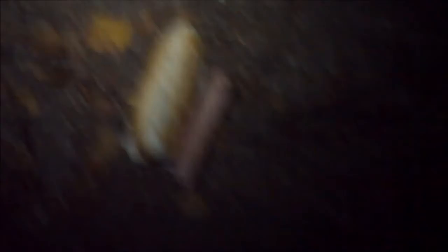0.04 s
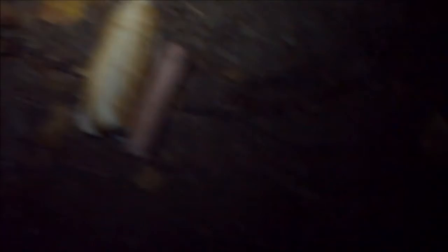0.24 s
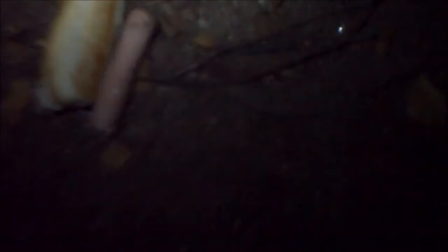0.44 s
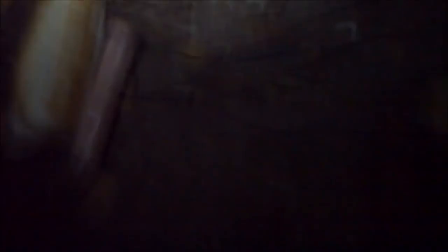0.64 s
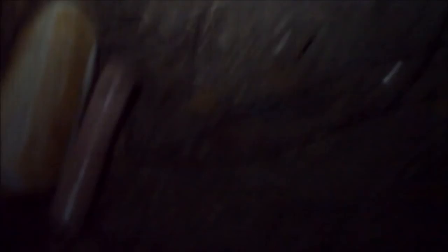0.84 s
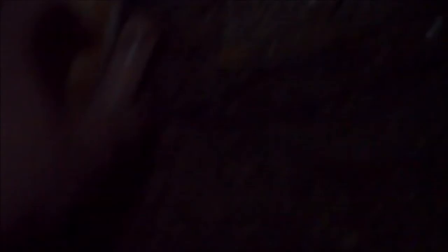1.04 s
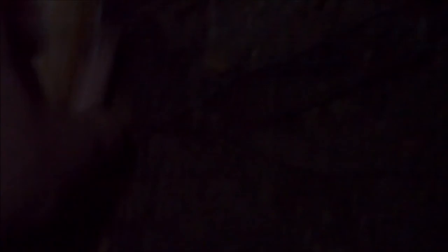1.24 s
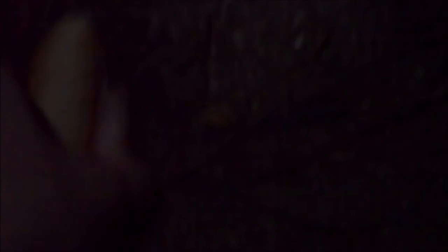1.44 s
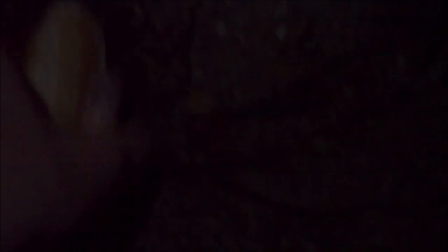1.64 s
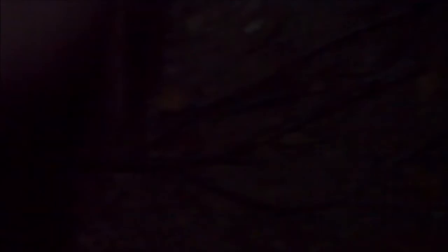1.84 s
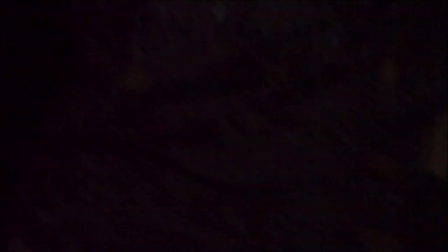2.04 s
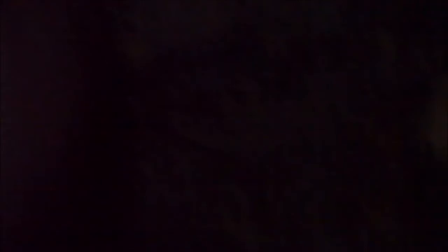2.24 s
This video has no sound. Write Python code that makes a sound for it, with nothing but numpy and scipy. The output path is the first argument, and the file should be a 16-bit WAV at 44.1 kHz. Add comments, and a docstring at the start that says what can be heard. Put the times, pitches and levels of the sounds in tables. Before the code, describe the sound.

A trap drops with a loud knock and metal snap, thuds again, and dry leaves rustle.

```python
"""A trap drops at night

Outdoors, close to the microphone: a wooden weight lands with a heavy knock and a steel snap that
overloads the input. It scrapes over dry litter, then comes down on its base with a duller, deeper thud.
Around it twigs tick, leaves rustle and crunch once underfoot, and air bumps the microphone over a hiss."""
import sys
import numpy as np
from scipy import signal
from scipy.fft import rfft, irfft, next_fast_len
from scipy.io import wavfile
from scipy.ndimage import uniform_filter1d, map_coordinates

SR = 44100
rng = np.random.default_rng(int(sys.argv[2]) if len(sys.argv) > 2 else 0)


def unload_wav(signal):
    """Save mono or channel-first audio to the path in sys.argv[1] as 16-bit WAV at rate SR, clipped to [-1, 1]."""
    wavfile.write(
        sys.argv[1],
        SR,
        np.round(np.clip(np.atleast_2d(signal).T, -1, 1) * 32767).astype(np.int16),
    )


N = 101429
T = np.arange(N) / SR
RING = T[:SR * 3 // 4]  # time since a blow, s


def amp(db):
    return 10 ** (np.asarray(db) / 20)


def unit_rms(x):
    return x / np.sqrt(np.mean(x ** 2) + 1e-20)


def along(points, hz):
    """Interpolate (Hz, value) points on a log frequency axis."""
    knots_hz, values = np.transpose(points)
    return np.interp(np.log(hz + 1), np.log(knots_hz + 1), values)


def filtered(x, response):
    """x through a gain that depends on frequency."""
    size = next_fast_len(len(x) + 8192)
    return irfft(rfft(x, size) * response(np.fft.rfftfreq(size, 1 / SR)), size)[:len(x)]


def coloured(x, spectrum):
    """x shaped by a spectrum, at rms 1."""
    return unit_rms(filtered(x, lambda hz: amp(along(spectrum, hz))))


def noise(spectrum, samples=N):
    return coloured(rng.standard_normal(samples), spectrum)


def wobble(knots_per_s):
    """A smooth random curve."""
    knots = rng.standard_normal(int(N * knots_per_s / SR) + 4)
    return map_coordinates(knots, [T * knots_per_s / SR])


def add(track, start_s, sound):
    part = track[round(start_s * SR):][:len(sound)]
    part += sound[:len(part)]


def swells(rows):
    """Envelope of bell-shaped swells, summed in power."""
    return np.sqrt(sum(amp(db) ** 2 * np.exp(-((T - peak_s) / np.where(T < peak_s, rise, fall)) ** 2)
                       for peak_s, db, rise, fall in rows))


def friction(spectrum, grains_per_s, patchy_db, spread_db=3.5):
    """Tiny crackles on an equally loud rubbing hiss, patchy in time and frequency, at rms 1."""
    grains = (rng.random(N) < grains_per_s / SR) * rng.choice([-1, 1], N)
    grains = grains * amp(spread_db * np.minimum(rng.exponential(size=N), 3))
    rubbing = coloured(unit_rms(grains) + rng.standard_normal(N), spectrum)
    bands = signal.stft(rubbing, nperseg=512)[2]
    patches = uniform_filter1d(rng.standard_normal(bands.shape), size=6, axis=0)
    patches = unit_rms(uniform_filter1d(patches, size=5, axis=1))
    return unit_rms(signal.istft(bands * amp(patchy_db * patches))[1][:N])


# Night hiss behind everything: freq_hz, density_db
HISS_SPECTRUM = [(12, -26), (20, -2), (45, -13.5), (139, -16.5), (401, -17), (541, -19.5), (1100, -20),
                 (1190, -23.5), (3650, -27), (5490, -33), (8970, -30), (13500, -36)]
# Its slow drift: time_s, level_db
HISS_LEVELS = [(0, -40.5), (.2, -42), (.75, -40), (1.0, -44), (1.37, -44.5), (1.7, -43), (1.95, -42.5),
               (2.3, -45.5)]
# Air right on the microphone: peak_s, level_db, rise_s, fall_s
BUMPS = [(.01, -34, .03, 0.017), (.375, -33.5, 0.03, 0.034), (1.115, -39.5, 0.03, 0.06),
         (1.68, -32, 0.016, 0.034), (1.78, -38.5, 0.054, 0.049)]
# Its rumble: freq_hz, density_db
BUMP_SPECTRUM = [(10, 5), (30, -0.5), (48, 0), (75, -21), (150, -29.5), (400, -68)]

def night_air(waver_db=0.78):
    """Faint outdoor hiss, and low bumps of air on the moving microphone."""
    hiss = noise(HISS_SPECTRUM) * amp(np.interp(T, *np.transpose(HISS_LEVELS)) + waver_db * wobble(15))
    return hiss + noise(BUMP_SPECTRUM) * swells(BUMPS)


# Footfalls under the crunch: peak_s, level_db, rise_s, fall_s
STEPS = [(2.0, -39, 0.021, .025), (2.12, -47.5, 0.026, 0.025)]
# Their low thump: freq_hz, density_db
STEP_SPECTRUM = [(30, -25), (80, -8), (115, 4), (170, -10.5), (300, -21), (800, -43)]

def footsteps():
    """A foot presses into the soft ground."""
    return noise(STEP_SPECTRUM) * swells(STEPS)


# Leaves stirred around the trap: peak_s, level_db, rise_s, fall_s
RUSTLES = [(.508, -33.5, 0.019, 0.0064), (.81, -43.5, 0.017, 0.031), (.905, -43, 0.023, 0.015),
           (1.15, -48.5, 0.16, 0.022), (1.255, -42, 0.033, 0.022), (1.305, -41, .008, 0.0076),
           (1.443, -40.5, .01, 0.014), (1.522, -38.5, 0.018, 0.013), (1.785, -47, 0.0069, 0.0067),
           (1.93, -42, 0.032, 0.025), (2.012, -24.5, 0.017, 0.024), (2.138, -36, 0.036, 0.014)]
# The steady rustle beneath: time_s, level_db
STIR_LEVELS = [(0, -59.5), (.5, -52.5), (.9, -45.5), (1.37, -50.5), (1.7, -46.5), (2.1, -47.5),
               (2.3, -42.5)]
# Dry leaf on leaf: freq_hz, density_db
LEAF_SPECTRUM = [(100, -12), (400, -7), (900, -6), (1300, -7), (1800, -2), (3500, -1), (5500, -2.5),
                 (8000, 0.5), (10300, 1), (12000, -5.5), (14000, -12.5)]

def leaves(flutter_db=2):
    """Dry leaves rub together, never quite still, with one louder crunch."""
    stir = amp(np.interp(T, *np.transpose(STIR_LEVELS)))
    rustle = friction(LEAF_SPECTRUM, grains_per_s=1500, patchy_db=1.3)
    return rustle * np.hypot(swells(RUSTLES), stir) * amp(flutter_db * wobble(220))


# Twigs and grit on the ground: start_s, level_db, centre_hz, t60_s, sharpness
TICKS = [(.093, -33.5, 2180, 0.039, 1.5), (0.6071, -27, 6000, 0.0055, .6), (0.6209, -16, 3600, 0.011, 0.64),
         (0.694, -26.5, 3160, 0.029, 2.1), (.709, -34.5, 1100, 0.043, 5.4), (.798, -28.5, 7040, 0.041, 2.1),
         (0.898, -36, 3780, 0.12, 2), (1.167, -34.5, 10000, 0.01, 1.2), (1.512, -39, 8000, .005, 0.74),
         (1.824, -31, 8500, 0.019, .7), (1.9954, -23.5, 7460, 0.042, 0.83), (2.013, -18, 7000, 0.038, .6),
         (2.035, -21, 3000, 0.015, 0.67)]

def twigs(rolloff_hz=11500):
    """Small dry ticks, each a noise burst through one broad resonance."""
    out, t = np.zeros(N), RING[:SR // 10]
    for start_s, db, centre_hz, t60, sharpness in TICKS:
        def resonance(hz):
            detuning = sharpness * (hz / centre_hz - centre_hz / (hz + 1))
            return 1 / (1 + detuning ** 2) / np.hypot(1, (hz / rolloff_hz) ** 8)
        burst = unit_rms(filtered(rng.standard_normal(len(t)), resonance))
        add(out, start_s, amp(db - 60 * t / t60) * burst)
    return out


# The weight sliding, close by: peak_s, level_db, rise_s, fall_s
SLIDES = [(.21, -39, 0.14, 0.047), (.33, -29.5, 0.068, 0.027), (.41, -26.5, 0.078, 0.035)]
# Wood on dry litter: freq_hz, density_db
SCRAPE_SPECTRUM = [(100, -8), (400, 7), (1000, 4), (1600, 0), (2500, 1.5), (4000, -4.5), (6000, -2.5),
                   (8000, -1), (10200, 2), (11500, -8), (14000, -6)]

def slide(flutter_db=1):
    """Between the two thuds the weight scrapes over the litter."""
    scrape = friction(SCRAPE_SPECTRUM, grains_per_s=7200, patchy_db=3.5)
    return scrape * swells(SLIDES) * amp(flutter_db * wobble(120))


# Decay of the wash, the wood's dense, short-lived modes: freq_hz, t60_s
WASH_DECAY = [(100, 0.59), (400, 0.39), (1000, 0.23), (3000, 0.097), (10000, 0.11)]

def knock(modes, wash_spectrum, contact, wash_db, attack_s=0.0006):
    """One blow on wood: clear modes plus a dense wash, both shaped by the contact's spectrum."""
    ring = sum(contact(hz) * amp(db - 60 * RING / t60) * np.sin(2 * np.pi * hz * RING)
               for hz, db, t60 in modes)
    wash = filtered(noise(wash_spectrum, len(RING)), lambda hz: np.sqrt(contact(hz)))
    band_hz, t, bands = signal.stft(wash, SR, nperseg=256)
    decay = amp(-60 * t / along(WASH_DECAY, band_hz)[:, None])
    wash = signal.istft(bands * decay, SR)[1][:len(RING)]
    return (amp(wash_db) * wash - ring) * (1 - np.exp(-RING / attack_s))


def struck_wood(modes, wash_spectrum, blows, deep_hz=396):
    """Edge hits are bright, flat ones dull; modes below deep_hz need the full weight behind a blow."""
    out = np.zeros(N)
    for start_s, db, bright_hz, deep_db, wash_db in blows:
        def contact(hz):
            return amp(deep_db / (1 + (hz / deep_hz) ** 4)) / np.hypot(1, (hz / bright_hz) ** 2)
        add(out, start_s, amp(db) * knock(modes, wash_spectrum, contact, wash_db))
    return out


# Modes of the wooden base: pitch_hz, level_db, t60_s
BASE_MODES = [(71, -15, .65), (127, -17, .49), (155, -16, .46), (191, -10, .32), (221, -4, .23),
              (254, -7, .29), (297, -7, .38), (390, -6, .15), (427, -7, .21), (543, -2, .15), (641, 2, .08),
              (713, -8, .1), (832, -5, .08), (878, -8, .09), (1073, -12, .12)]
# Its wash: freq_hz, density_db
BASE_WASH = [(30, -22.5), (120, 1), (300, -5.5), (700, -7.5), (1050, -9.5), (1350, -12.5), (2200, -5),
             (4000, -13.5), (9000, -10.5), (14000, -47)]
# Blows on the base: start_s, level_db, bright_hz, deep_db, wash_db
BASE_BLOWS = [(.4868, -5.5, 1840, -14, -9), (.4943, -16, 1350, -6, -7), (.5131, -10, 550, 1, -5),
              (.698, -38, 2400, -8, 1)]

def base():
    """The base gives a deep thud as the weight comes down on it."""
    return struck_wood(BASE_MODES, BASE_WASH, BASE_BLOWS)


# Steel contacts close to the microphone, the slam first: start_s, level_db, hold_s
SNAPS = [(0.2472, -5, 0.0025), (0.256, -11, 0.0014), (0.261, -19.5, 0.0016), (0.2644, -15.5, 0.0017)]
# Their crack: freq_hz, density_db
CRACK_SPECTRUM = [(500, -19), (1500, 7), (3500, -1), (5300, 7), (8000, 6.5), (10500, 6), (12000, -3),
                  (14000, -5)]
# Modes of the catch: pitch_hz, level_db, t60_s
STEEL_MODES = [(2000, -12.5, .08), (2380, -12, 0.065), (3670, 13, 0.047), (5070, 3, 0.083),
               (7000, 7, 0.081), (7380, 6, 0.15), (9000, -12, .12), (9400, 11, 0.12), (10620, 10.5, 0.16),
               (11800, -9, .06)]

def steel_catch(crack_t60_s=0.017, ring_db=-27, chatter_db=-18, chatter_t60_s=0.1, jitter_rad=1.3):
    """The steel catch slams shut, chatters and rings briefly with unsteady phase."""
    out, t = np.zeros(N), RING
    for start_s, db, hold_s in SNAPS:
        envelope = amp(db - 60 * np.maximum(t - hold_s, 0) / crack_t60_s)
        add(out, start_s, envelope * noise(CRACK_SPECTRUM, len(t)))
    ring = sum(amp(db - 60 * t / t60) * np.sin(2 * np.pi * hz * t + jitter_rad * wobble(300)[:len(t)])
               for hz, db, t60 in STEEL_MODES)
    chatter = amp(chatter_db - 60 * t / chatter_t60_s) * noise(CRACK_SPECTRUM, len(t))
    add(out, SNAPS[0][0], amp(ring_db) * ring + chatter)
    return out


# Modes of the wooden weight: pitch_hz, level_db, t60_s
WEIGHT_MODES = [(154, -13, .26), (220, -14, .38), (239, -14, .5), (279, -12, .35), (362, 1.5, .15),
                (411, -10, .25), (522, -1, .1), (574, -1, .13), (601, -3, .13), (664, 1, .17),
                (789, -8, .19), (846, 4, .11), (964, -10, .16), (1038, -20, .31)]
# Its wash: freq_hz, density_db
WEIGHT_WASH = [(30, -37), (120, -1.5), (300, 1), (600, -1.5), (950, 3.5), (1300, -41), (1900, -9),
               (3500, -30), (7000, -39), (14000, -52)]
# The drop, close to the microphone: start_s, level_db, bright_hz, deep_db, wash_db
WEIGHT_BLOWS = [(.092, -38, 1800, 2, 2), (.2375, -13, 900, -1, 0), (.2425, -2.5, 1090, -6, -13),
                (.2538, -14, 320, 8, -9), (.2868, -14, 570, -1, -14), (.3281, -21.5, 2300, 3, -4),
                (.4265, -28, 2040, -7, -4)]

def weight(low_cut_hz=90):
    """The falling weight lands with a hard wooden knock, with the bass below 90 Hz filtered off."""
    low_cut = signal.butter(2, low_cut_hz, "highpass", fs=SR, output="sos")
    return signal.sosfilt(low_cut, struck_wood(WEIGHT_MODES, WEIGHT_WASH, WEIGHT_BLOWS))


def scene():
    """One microphone outdoors: the trap up close, the litter round it, night air behind."""
    trap = weight() + steel_catch() + slide() + base()
    return (trap + twigs() + leaves() + footsteps() + night_air())[None]


def record(dry):
    """The microphone input overloads on the loudest blow; nothing above 14 kHz is kept."""
    clipped = dry[0] / (1 + np.abs(dry[0]) ** 8) ** (1 / 8)
    return filtered(clipped, lambda hz: hz < 14000)[None]


dry = scene()
out = record(dry)
unload_wav(out)
```